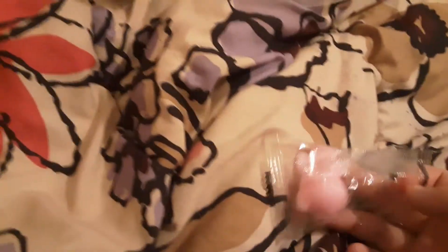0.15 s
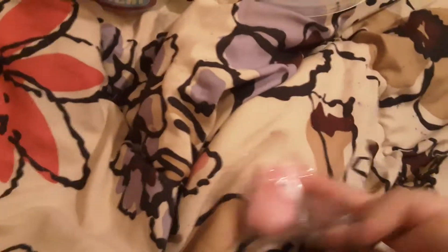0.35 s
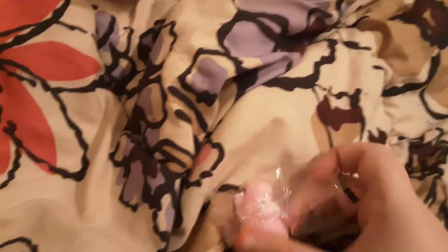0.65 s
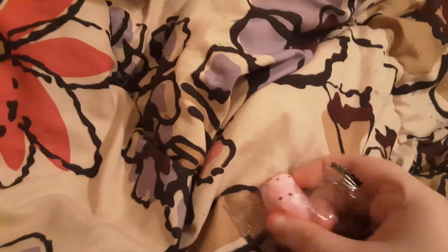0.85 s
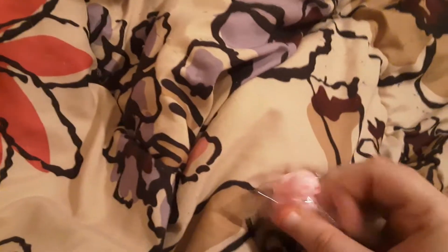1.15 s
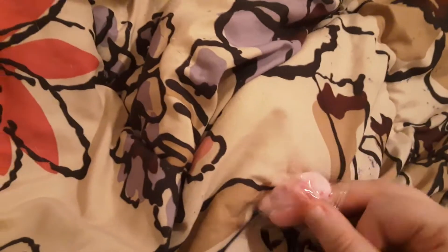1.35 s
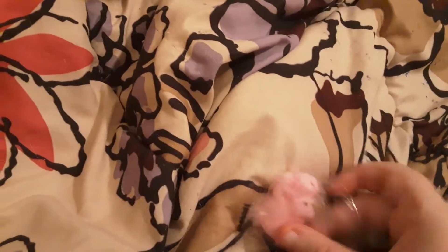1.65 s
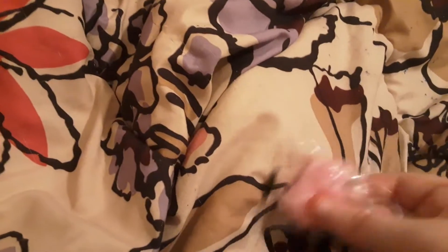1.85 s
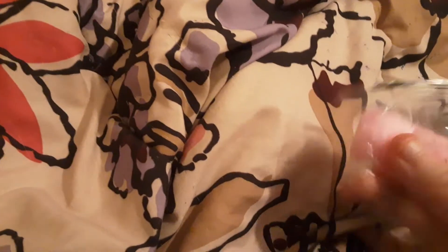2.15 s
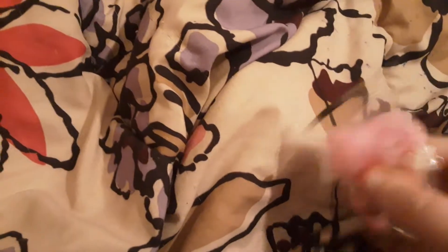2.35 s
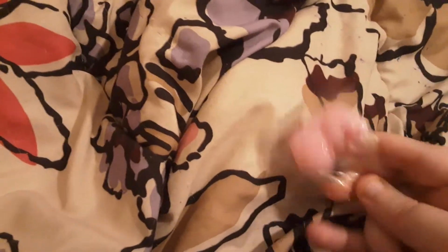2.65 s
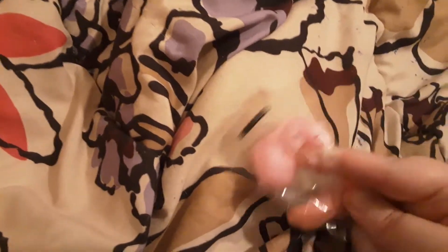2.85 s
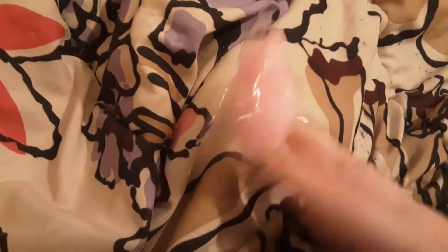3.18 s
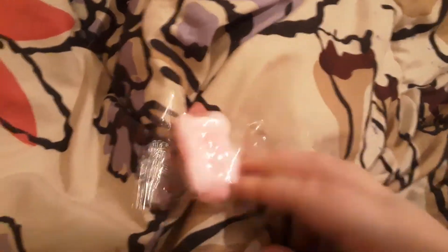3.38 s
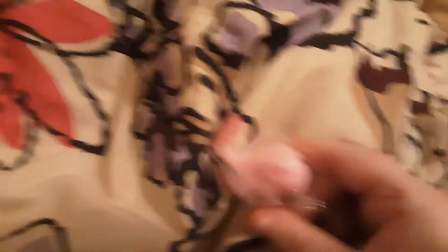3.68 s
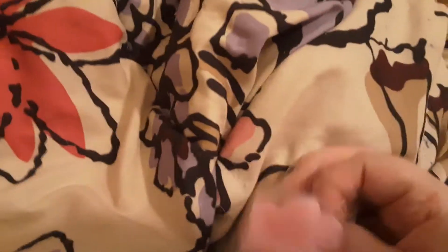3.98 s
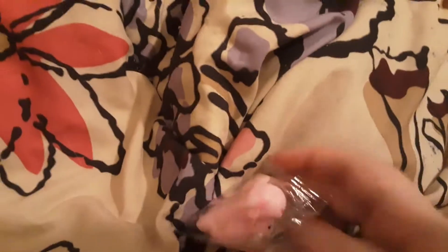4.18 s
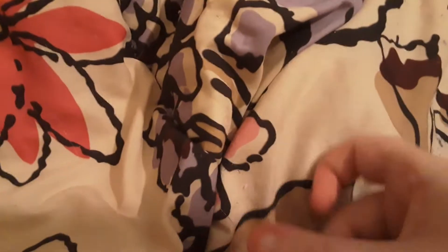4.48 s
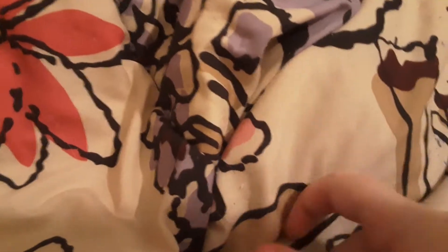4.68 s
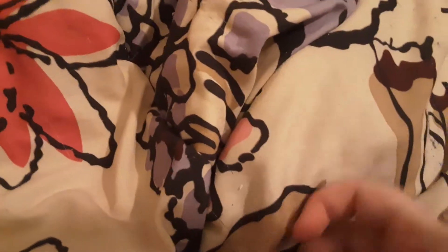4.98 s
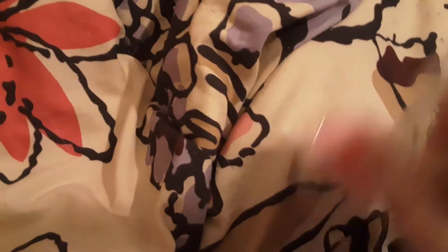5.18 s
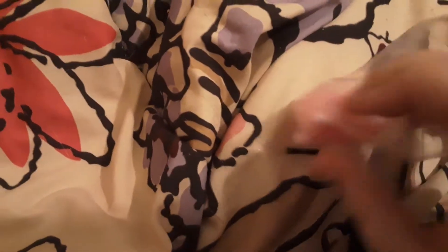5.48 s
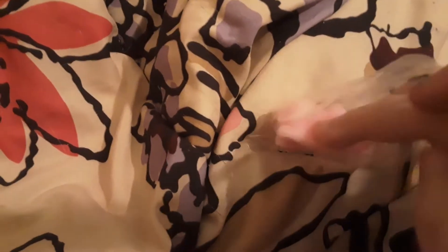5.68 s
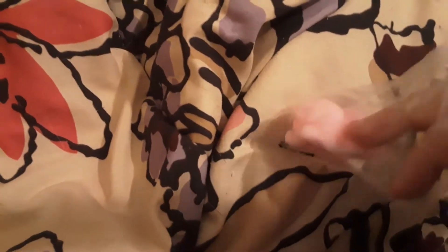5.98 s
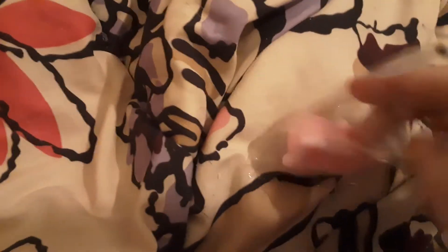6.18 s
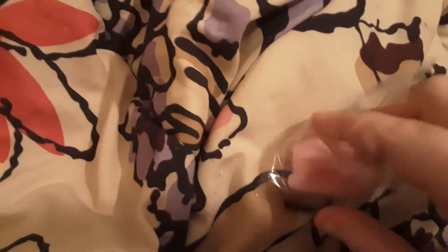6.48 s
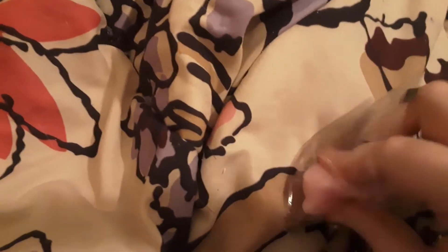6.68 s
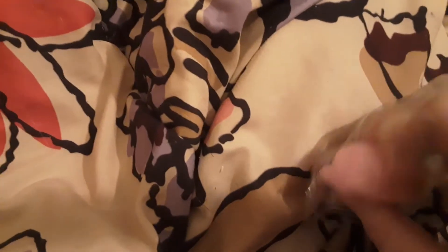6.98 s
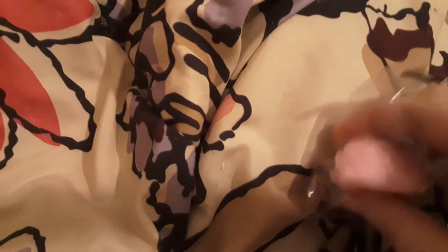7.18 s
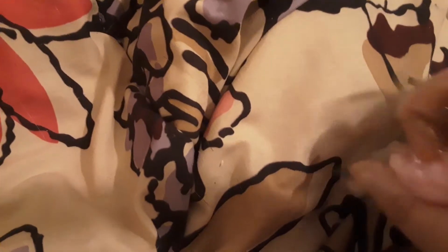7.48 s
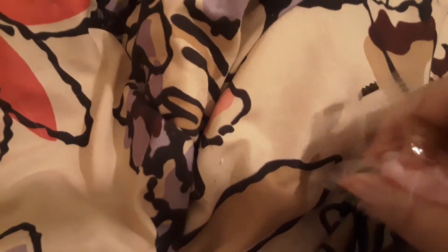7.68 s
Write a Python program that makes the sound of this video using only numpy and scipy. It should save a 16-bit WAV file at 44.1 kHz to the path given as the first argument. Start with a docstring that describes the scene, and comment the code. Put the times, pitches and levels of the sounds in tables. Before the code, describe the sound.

Continuous plastic crinkling, bright and brittle, comes in irregular crushes with brief gaps. Large folds snap singly, small ones fizz in clusters, and the stuffed packet gives soft, dull thuds. One standout click cuts through after the middle, followed by sparser crackle, a renewed dense flurry and a short ticking creak. Close miking, nearly dry small room, faint low beating motor hum underneath.

```python
"""From the first moment a hand kneads a thin, stiff plastic wrapper over a bed, close to a small microphone.
Its folds snap by buckling, large ones singly, small ones in swarms over a rustle of sliding film.
Knocks of a stuffed bag fall among them; the loudest snap comes past the middle, then the snaps thin out,
crowd together again and, near the end, a short stick-slip creak ticks. Throughout, the bed reflects once,
the walls reverberate faintly, and a distant motor beats in the quiet, resonant room."""
import sys
import numpy as np
from scipy import signal
from scipy.fft import rfft, irfft, next_fast_len
from scipy.io import wavfile
from scipy.ndimage import map_coordinates

SR = 44100
rng = np.random.default_rng(int(sys.argv[2]) if len(sys.argv) > 2 else 0)


def master(y):
    """Save y as 16-bit WAV."""
    cut = np.clip(np.atleast_2d(y).T, -1, 1)
    pcm = np.round(cut * 32767)  # scale
    wavfile.write(sys.argv[1], SR, pcm.astype(np.int16))


N = 345744


def amp(db):
    """Logarithmic level: decibels to amplitude gain."""
    return 10 ** (np.asarray(db) / 20)


def unit(x):
    """Normalisation to an rms of 1."""
    return x / np.sqrt(np.mean(x ** 2) + 1e-20)


def along(points, hz):
    """Linear interpolation of (frequency [Hz], value) points on a logarithmic frequency axis."""
    f, v = np.transpose(points)
    return np.interp(np.log(hz + 1), np.log(f + 1), v)


def wobble(rate):
    """Band-limited fluctuation: a smooth curve through random knots, rate of them a second."""
    knots = rng.standard_normal(int(N * rate / SR) + 4)
    return unit(map_coordinates(knots, [np.arange(N) * rate / SR]))


def filtered(x, response):
    """Linear filtering: the spectrum of x times a response of frequency."""
    m = next_fast_len(N + SR // 2)
    hz = np.fft.rfftfreq(m, 1 / SR)
    return irfft(rfft(x, m) * response(hz), m)[..., :N]


# The film as the microphone hears it, with the port resonance near 6 kHz:
# (frequency [Hz], relative spectral level [dB])
FILM_RESPONSE = [(180, -39.5), (300, -17), (427, -20), (685, -10), (1080, -17), (2340, -5.5), (3020, -15),
                 (4680, -6), (6330, 2.5), (8020, -5.5), (9020, -10), (13300, -8.5), (15500, -20),
                 (16800, -33)]
KNOCK_HZ, THUMP_HZ, FIZZ_HZ = 1350, 3050, 8700  # edges between knock, thump, crack and fizz


def film_parts(size=1024):
    """Minimum-phase response: four causal bands of the film, knock to fizz, each of mean power 1."""
    hz = np.fft.rfftfreq(size, 1 / SR)
    under = [1 / (1 + (hz / edge) ** 10) for edge in (KNOCK_HZ, THUMP_HZ, FIZZ_HZ)]
    shares = np.diff([0 * hz, *under, 1 + 0 * hz], axis=0)
    magnitude = amp(along(FILM_RESPONSE, hz)) * np.sqrt(np.abs(shares))
    # folding the cepstrum onto positive time makes each response causal
    cepstrum = irfft(np.log(magnitude + 1e-5), size)
    cepstrum[:, 1:size // 2] *= 2
    cepstrum[:, size // 2 + 1:] = 0
    parts = np.exp(rfft(cepstrum))
    return parts / np.sqrt(np.mean(np.abs(parts) ** 2, axis=1, keepdims=True))


def buckle(s, levels_db, rise_s, jolt_s, tail_s, tail_db, size=512):
    """Snap-through buckling: noisy force rises, jolts at time s and trembles, heard in four bands.

    Rise, jolt and tail are times per 60 dB; levels_db sets the energy of each band of each fold.
    """
    lead = size // 8  # samples kept for the rise
    t = (np.arange(size) - lead) / SR
    before = amp(60 * t / rise_s)
    after = amp(-60 * t / jolt_s) + amp(tail_db - 60 * t / tail_s)
    force = np.where(t < 0, before, after) * rng.standard_normal((len(s), size))

    # each fold frees a facet with its own damped pitch
    hz = np.fft.rfftfreq(2 * size, 1 / SR)
    facet_hz = 3200 * np.exp(rng.uniform(-1.46, 1.456, (len(s), 1)))
    damping_hz = .22 * facet_hz
    ring = 1 + 2.5j * hz * damping_hz / (facet_hz ** 2 - hz ** 2 + 1j * hz * damping_hz)

    spectrum = rfft(force, 2 * size) * ring * film_parts(2 * size)[:, None]
    sound = irfft(spectrum)[..., :size]
    sound *= amp(levels_db)[..., None] / np.linalg.norm(sound, axis=2, keepdims=True)
    at = (np.round(s * SR).astype(int)[:, None] + np.arange(size)).ravel()
    return np.array([np.bincount(at, part.ravel(), N + size)[lead:N + lead] for part in sound])


# Large folds snapping: (time [s], nominal crack level [dB],
# panel thump relative to crack [dB], edge fizz relative to crack [dB])
LARGE_SNAPS = [(0.0156, -17.0, -15, -15), (0.049, -16, -17, -8), (0.1185, -22, -28.5, -2),
               (0.1524, -20, -18, -16), (0.2, -17, -30, -10), (0.2125, -10, -16, -9),
               (0.2269, -14, -6, -12), (0.2664, -7.5, -21, -21), (0.2817, -17, -4, -10),
               (0.292, -14, -28, -16), (0.3018, -18, -10, -23), (0.3325, -19.5, -2, -9),
               (0.3471, -17, -24, -10), (0.4518, -13.5, -7.5, -4), (0.472, -11.5, -14, -1),
               (0.513, -8, -17, -17), (0.5747, -15, -26, -15), (0.611, -15.5, -22, -20),
               (0.6319, -18.0, -3.5, -12), (0.6536, -18, -12, -16), (0.6699, -15.5, -14, -12),
               (0.7045, -5.5, -16, -17), (0.7164, -15, -17, -22), (0.7529, -26, -20, -2),
               (0.7607, -15, -11, -19), (0.7664, -23, -15, -23), (0.7803, -18, -14, -9),
               (0.7984, -12, -12, -20), (0.8018, -14, -10, -11), (0.817, -3, -28, -4),
               (0.8307, -10.5, -19, -9), (0.837, -23, -23, -2), (0.8629, -20, -25, -1),
               (0.8672, -13, -23, -2), (0.881, -17, -13, -14), (0.8896, -13.5, -16, -11),
               (0.927, -16.5, -19, -16), (0.9324, -13, -24, -5), (0.9578, -27, 1.5, -18),
               (0.9664, -19, -24, -7), (0.9766, -9.5, -32, -16), (0.9804, -5.5, -36, -28),
               (0.987, -14.5, -16, -5), (1.0125, -9, -23, -5), (1.0259, -10.5, -18, -7),
               (1.0521, -19.5, -9, -15), (1.055, -12, -15, -1), (1.0643, -14, -18, -14),
               (1.073, -14, -26, -2), (1.0785, -7, -35, -19), (1.1422, -15.5, -24, -21),
               (1.1552, -14, -17, -2), (1.1692, -19, -12, -8), (1.1885, -9, -32, -13),
               (1.1955, -8.5, -32, -2), (1.2308, -12, -11, -6), (1.339, -9.5, -15, -19),
               (1.342, -12.5, -9, 1), (1.39, -11.0, -19, -18), (1.403, -16.0, -17, 0),
               (1.4977, -21, -15, -11), (1.5138, -18.5, -21, -17), (1.581, -18, -15, -12),
               (1.6152, -16, -17, 0), (1.6523, -16, -16, -17), (1.661, -13.0, -31, -13),
               (1.6947, -15, -20, -15), (1.7079, -20, -22, -12), (1.7193, -14.5, -8, -14),
               (1.8041, -26, -18, 2), (1.8132, -10, -20, -9), (1.847, -13, -18, -20),
               (1.9596, -19, -32, -10), (1.9846, -10.5, -18.5, -13), (2.0452, -16, -4, 5),
               (2.048, -9.5, -16, -15), (2.0543, -12, -9, -13), (2.078, -5.5, -16.5, -13),
               (2.1592, -17, -12, -7), (2.1643, -17.5, -4, -3), (2.2033, -16, -11, -10),
               (2.217, -19, -18, -15), (2.2263, -20, -21, -15), (2.2681, -17, -9, 0),
               (2.2924, -23.5, -16, -13), (2.3149, -22.5, -0.5, -17), (2.3632, -15, -8.5, -4),
               (2.3952, -9, -11, -2), (2.4014, -14.5, -6, 0), (2.406, -9.5, -21, -19),
               (2.4652, -13.5, -17, -15), (2.4839, -20, -33, -11), (2.5205, -16.5, -17, 3.5),
               (2.5511, -17.5, -13.5, -4), (2.6057, -16, -12, -15), (2.6202, -10, -23.5, -6),
               (2.6549, -21.0, -28, -9), (2.661, -16, -17, -10), (2.6979, -12, -21, -16),
               (2.7134, -19, -16, -17), (2.7785, -21.5, -29, -15), (2.851, -22, -26, -18),
               (2.9934, -14.5, -29, -23), (3.005, -11, -12.5, -12), (3.064, -8.5, -26, -5),
               (3.0788, -10.5, -9.5, -10), (3.0866, -10, -9, 1), (3.1025, -24.5, -11, 14),
               (3.1555, -9, -12.5, -3), (3.2143, -9, -37, -4), (3.2208, -18, -17, -12),
               (3.2543, -14.0, -19, 1), (3.268, -14.5, -32, -2), (3.2818, -10, -15, -9),
               (3.2882, -12, -31, 3), (3.3751, -20.5, -11, -23), (3.3847, -10.5, -20, -16),
               (3.389, -17, -18, -13), (3.407, -14, -19, -9), (3.434, -12.5, -15, -11),
               (3.4665, -18, -9, -3), (3.507, -19.5, -21, -8), (3.5336, -21, -20, -6), (3.56, -11, -12, -6),
               (3.5658, -11.5, -14, -4), (3.5707, -13.5, -10.5, -4), (3.602, -18, -17, -4),
               (3.614, -25, -11, -12), (3.639, -8, -18, -2), (3.711, -15, -25, -6), (3.722, -10, -31, -8),
               (3.734, -13, -12, -13), (3.7466, -11, -5, -1), (3.7634, -9.0, -26, -18),
               (3.7748, -3.5, -30, -15), (3.8044, -23, -9, -11), (3.8199, -13, -26, -8),
               (3.8239, -20, -25, -16), (3.8437, -19, -25, -17), (3.8469, -11.5, -11.5, -5),
               (3.8726, -23, -9, -7), (3.9193, -20.5, -20, -7), (3.9656, -22, -29, 7),
               (3.9764, -9, -22, -3), (4.0086, -9, -24, -13), (4.0335, -15, -23, -8),
               (4.0548, -9.5, -18, -11), (4.0653, -23, -2, 8), (4.0934, -20, -10, -18),
               (4.1058, -18, -3.5, -1), (4.1097, -13.5, -12, -6), (4.163, -16, -14, -18),
               (4.1708, -16.5, -11.5, -11), (4.2402, -20.5, -17, -13), (4.297, -15.0, -16, -11),
               (4.309, -6, -23, -14), (4.3308, -16, -26, -13), (4.3383, -11, -29, -23),
               (4.3435, -4, -16, -14), (4.3559, -6.5, -25, -14), (4.3662, -8.5, -15.5, -6),
               (4.3715, -17, -26, -10), (4.503, -17, -15.5, -13), (4.5711, 0.5, -23, -19),
               (4.5924, -7, -18, -9), (4.5956, -7, -10.5, -8), (4.6661, -16, -11, -7),
               (4.692, -17.5, -7.5, -17), (4.8284, -20, -22, -16), (4.8418, -11, -15, -17),
               (4.846, -17, -19, -17), (4.8704, -16, -19, -14), (4.8776, -19, -6, -11),
               (4.9022, -14, -12, -3), (4.913, -22.5, -9, -7), (4.9686, -12, -11, -14),
               (4.987, -12, -11, -16), (5.012, -19.5, 0, -19), (5.028, -12, -14, -12),
               (5.0581, -10, -8.5, -19), (5.1531, -16.5, -8, 1), (5.255, -16.5, -17, -15),
               (5.2749, -13.5, -18, -21), (5.376, -21, -13, -4), (5.3927, -12, -13.5, -5),
               (5.4036, -6.5, -18, -3), (5.4306, -16.5, -16, -7), (5.4688, -16, -11, -15),
               (5.5648, -16.5, -9, -3), (5.5718, -10, -13, -4), (5.5858, -17.0, -18, 1),
               (5.6173, -15, -10, -16), (5.648, -15, -17, -13), (5.6523, -20, -14, 0),
               (5.7129, -17.5, -13, -9), (5.7876, -17.5, -14, -7), (5.9454, -23.5, -15, -9),
               (5.9683, -14, -15.5, -14), (6.132, -11, -9, -12), (6.19, -17.5, -10, -9),
               (6.259, -17.5, -17, 1.5), (6.2816, -20.5, -4.5, -4), (6.4894, -19.5, -2, -12),
               (6.5092, -24, -6, -1), (6.5212, -16, -9, -8), (6.5406, -22.5, -6, -11),
               (6.548, -18.5, -21, 2.5), (6.562, -18, -8, -4), (6.5935, -21, -10, -9),
               (6.6089, -14, -13, -10), (6.677, -20, -22, -4), (6.7468, -14.5, -15, -6),
               (6.7552, -10, -16, -10), (6.8027, -18, -18, 1), (6.813, -9, -13, -3), (6.824, -8.5, -22, 2),
               (6.8344, -16.5, -1.5, -12), (6.8471, -10, -7, -7), (6.8668, -14.0, -18, -6),
               (6.8723, -16, -13, -9), (6.89, -12, -17, -11), (6.8927, -19, -20, -7),
               (6.943, -14.5, -23, 0), (6.947, -13, -24, -10), (6.9604, -11, -9, -1),
               (6.9639, -12, -17, -5), (6.9717, -22, -18, -2), (7.0252, -8.5, -17, -7),
               (7.031, -17, -12, -5), (7.0478, -13, -16, -7), (7.0523, -16, -16, -9),
               (7.069, -17.5, -13, -12), (7.0876, -7, -13, -2), (7.0913, -12, -13, -9),
               (7.1004, -6.5, -24, -12), (7.1105, -9, -18, -3), (7.1144, -9.5, -14, -8),
               (7.1424, -23.0, -25, 8), (7.1543, -9.5, -17, -7), (7.164, -10.5, -11, -1),
               (7.185, -9.5, -12, -5), (7.2577, -24, -6, -6), (7.2732, -18, -20, 0),
               (7.2847, -16.5, -25, -12), (7.3335, -19, -27, 3), (7.3414, -13, -24, -12),
               (7.365, -12, -12, -23), (7.3696, -16.0, -11, -9), (7.379, -13.5, -6.5, -9),
               (7.387, -14, -23, -6), (7.4093, -16.5, -5, -3), (7.4204, -12.5, -21, -3),
               (7.4897, -27, 2, -3), (7.5898, -14, -7, -7), (7.6294, -17, -22, -9), (7.6517, -15, -31, -13),
               (7.688, -21.0, -8, -16), (7.7113, -21, -22, -15), (7.8304, -18, -4.5, -7),
               (7.8376, -10, -1.5, -13)]
# a snap's knock under its crack [dB]; its share of the thump's swing; its random spread [dB]
KNOCK_DB, KNOCK_FOLLOWS, KNOCK_SCATTER_DB = -20, 0.49, 4


def large_folds():
    """Snap-through of single large folds; a deeper thump brings on average a stronger knock of the bag."""
    s, crack_db, thump_db, fizz_db = np.transpose(LARGE_SNAPS)
    knock_db = KNOCK_DB + KNOCK_FOLLOWS * thump_db + KNOCK_SCATTER_DB * rng.standard_normal(len(s))
    # deeper parts ring longer, so hold more energy for their peak
    spread_db = [[15.5], [13.5], [10.5], [8.5]]
    levels_db = crack_db + np.array([knock_db, thump_db, 0 * s, fizz_db]) + spread_db
    return buckle(s - .0002, levels_db, rise_s=.0017, jolt_s=.0011, tail_s=.007, tail_db=-19).sum(0)


def small_folds():
    """Superposed random impulses: swarms of small snaps over the friction noise of film sliding on film."""
    t = np.arange(N) / SR
    swarm_db = 2.9 * np.tanh(1.0 * wobble(70))  # neighbouring folds swell together
    draw = rng.random((2800, 6))  # one row a fold: time, size and the colour of four bands
    when = draw[:, 0] * (N - 1) / SR
    scatter_db = 2.94 * np.minimum(-np.log(draw[:, 1] + 1e-9), 3.5)
    size_db = np.interp(when, t, swarm_db) + scatter_db
    colour_db = 17.3 * (draw[:, 2:].T - .5)
    folds = buckle(when, size_db + colour_db, rise_s=0.0016, jolt_s=0.0014, tail_s=0.0039, tail_db=-19)
    folds /= np.sqrt(np.mean(folds ** 2, axis=1, keepdims=True))

    noise = rng.standard_normal((4, N))
    sliding = signal.fftconvolve(noise, irfft(film_parts()), axes=1)[:, :N]

    coarse_t = t[::64]
    hand_db, dull_db = (np.interp(t, coarse_t, curve) for curve in hand(coarse_t))
    # about .6 at rest, where small snaps weaken a little beside the sliding film; near 1 in a crush
    busy = 1 / (1 + np.exp(-(hand_db + 62.5) / 3))
    sliding_db = -2.5 - 7.3 * busy + busy * (0.75 * swarm_db + 4.1 * wobble(160))
    bands = amp(-1.5) * busy * folds + amp(sliding_db) * sliding
    knock, thump, crack, fizz = bands * amp(hand_db)
    dull = amp(-4.0) * knock + amp(1.8) * thump
    return amp(dull_db) * dull + amp(4.04) * crack + amp(-5.5) * fizz


# The hand closing on the film: (start [s], hold [s], drive of the small folds [dB],
# their low parts relative to that drive [dB])
HAND_CRUSHES = [(0.003, 0.028, -59, -1), (0.052, 0.099, -52, 2), (0.151, 0.016, -42.5, 2),
                (0.218, 0.11, -37.5, -5.5), (0.382, 0.047, -47, -1.5), (0.446, 0.13, -48, -3),
                (0.496, 0.008, -36, -8), (0.558, 0.11, -41, -3), (0.715, 0.025, -37.5, -1.5),
                (0.785, 0.016, -27, -7.5), (0.897, 0.25, -42, -7), (1.03, 0.009, -37, -17),
                (1.161, 0.081, -38.5, -7.5), (1.337, 0.032, -42.5, -4.5), (1.535, 0.11, -35, -6.5),
                (1.696, 0.043, -35, -3.5), (1.778, 0.02, -41, -3), (1.864, 0.034, -37.5, -7.5),
                (1.963, 0.13, -39, -9), (1.976, 0.011, -29.5, -6.5), (2.081, 0.028, -39.5, -17),
                (2.162, 0.032, -41.5, -8), (2.247, 0.036, -43.5, -5), (2.36, 0.14, -44, -6),
                (2.401, 0.007, -34.5, -7), (2.55, 0.078, -45.5, -8.5), (2.674, 0.017, -35.5, -6),
                (2.76, 0.16, -53.5, -2), (3.016, 0.13, -40.5, -3), (3.077, 0.0079, -30, -8),
                (3.185, 0.082, -39, -8.5), (3.31, 0.028, -48, -6), (3.388, 0.118, -42, -3.5),
                (3.519, 0.085, -38.5, -5), (3.715, 0.026, -41, -3.5), (3.795, 0.043, -32.5, -8.5),
                (3.92, 0.2, -39, -6.5), (4.219, 0.065, -51, 0), (4.298, 0.051, -39.5, -4),
                (4.331, 0.016, -31.5, -5), (4.47, 0.03, -50.5, -1), (4.588, 0.057, -37.5, -3),
                (4.823, 0.01, -32, -2.5), (4.915, 0.075, -42.5, -1.5), (5.037, 0.084, -33, -3.5),
                (5.2, 0.043, -48, 1), (5.267, 0.021, -37, -7), (5.398, 0.077, -42, -3.5),
                (5.544, 0.029, -40.5, -4), (5.639, 0.035, -44, -5.5), (5.755, 0.05, -48.5, -3),
                (5.849, 0.036, -44.5, -8.5), (5.98, 0.022, -49, -3), (6.065, 0.073, -46, -1.5),
                (6.18, 0.037, -45, -4), (6.255, 0.036, -48, -4), (6.324, 0.035, -72, -2),
                (6.463, 0.21, -48.5, -1.5), (6.675, 0.027, -42, -7.5), (6.758, 0.039, -46.5, 1),
                (6.821, 0.047, -36.5, -5.5), (6.906, 0.034, -36.5, -7), (7.018, 0.1, -41, -6),
                (7.164, 0.03, -37, -3), (7.276, 0.048, -40, -6), (7.37, 0.011, -36, -8.5),
                (7.465, 0.03, -53.5, -3), (7.541, 0.0035, -35.5, -4), (7.64, 0.045, -45, -10.5),
                (7.746, 0.071, -45.5, -3)]
ATTACK_DB_PER_S, RELEASE_DB_PER_S = 595, 280
REST_DB, REST_DULL_DB = -61, -7  # drive and relative low parts between crushes


def hand(t):
    """Power summation of crushes that rise fast, hold and release slowly; gives drive and dullness in dB."""
    start, hold, db, dull_db = np.transpose(HAND_CRUSHES)[..., None]
    attack_db = ATTACK_DB_PER_S * np.maximum(start - t, 0)
    release_db = RELEASE_DB_PER_S * np.maximum(t - start - hold, 0)
    power = amp(db - attack_db - release_db) ** 2
    rest = amp(REST_DB) ** 2
    total = power.sum(0) + rest
    dullness_db = ((power * dull_db).sum(0) + rest * REST_DULL_DB) / total
    return 10 * np.log10(total), dullness_db


# The stuffed bag knocking as it gives way: (time [s], nominal level [dB])
BAG_KNOCKS = [(0.047, -37), (0.067, -24.5), (0.231, -25.5), (0.78, -28), (1.024, -27), (1.09, -27.5),
              (1.338, -35), (1.565, -24), (1.676, -30), (1.775, -26.5), (2.398, -20.5), (3.004, -29),
              (3.154, -26), (3.213, -23.5), (3.279, -33), (3.382, -42), (3.733, -27), (3.894, -27.5),
              (4.088, -27), (4.169, -25), (4.555, -29), (4.967, -22.5), (5.026, -27), (5.374, -30),
              (5.458, -29.5), (5.571, -23), (5.966, -26), (6.13, -39), (6.279, -23), (6.521, -25),
              (6.663, -34), (6.745, -25), (7.022, -26), (7.05, -21), (7.087, -37), (7.183, -22.5),
              (7.275, -28), (7.361, -37), (7.488, -20.5), (7.588, -41)]


def knocks():
    """Impulsive excitation of the whole bag: dull blows, nearly all low part."""
    s, db = np.transpose(BAG_KNOCKS)
    levels_db = db + np.array([[13], [4], [-3], [-12]])
    return buckle(s + 0.001994, levels_db, rise_s=0.0031, jolt_s=0.006, tail_s=0.0075, tail_db=-12).sum(0)


# Film creaking as it is drawn tight: (start [s], end [s], slip rate [1/s], nominal level [dB])
FILM_CREAKS = [(7.732, 7.812, 280, -23.5)]


def creaks():
    """Stick-slip friction: dull ticks at a nearly even rate, swelling and fading."""
    out = np.zeros(N)
    for start, end, rate, db in FILM_CREAKS:
        s = np.arange(start, end, 1 / rate)
        place = (2 * s - start - end) / (end - start)  # -1 at the start, 1 at the end
        swell_db = -9 * place ** 2 + rng.normal(0, 1.5, len(s))
        levels_db = db + swell_db + np.array([[-1.2], [0], [-5.5], [-15]])
        s = s + rng.normal(0, 0.077, len(s)) / rate
        out += buckle(s, levels_db, rise_s=0.0013, jolt_s=0.00079, tail_s=0.0033, tail_db=-27).sum(0)
    return out


# Decay of the reverberation between the walls: (frequency [Hz], time to fall 60 dB [s])
WALL_DECAY = [(300, 0.64), (2000, 0.43), (6000, 0.028), (14000, 0.058)]


def room(x):
    """Reflection and reverberation: one bounce off the bed, then a tail decaying by frequency."""
    hz, t, z = signal.stft(rng.standard_normal(SR // 4), SR, nperseg=256)
    decay = amp(-60 * t / along(WALL_DECAY, hz)[:, None])
    tail = signal.istft(z * decay, SR, nperseg=256)[1]
    tail /= np.linalg.norm(tail)
    bed = amp(-22.5) * np.pad(x, (round(0.0031 * SR), 0))[:N]
    walls = amp(-25.0) * signal.fftconvolve(np.pad(x, (200, 0)), tail)[:N]
    return bed + walls


# Spectrum of the room air: (frequency [Hz], relative spectral level [dB])
AIR_SPECTRUM = [(20, -45), (39, -23), (50, -3), (100, -9.5), (180, -10), (230, -10), (300, -16),
                (450, -17.5), (700, -18.5), (1100, -23), (2400, -44), (2950, -66), (6600, -56),
                (12000, -65), (16000, -56)]
# Room resonances, each a narrow band of noise:
# (centre [Hz], half-width where amplitude falls to 1/e [Hz], rms level [dB])
ROOM_RESONANCES = [(57.6, 6.2, -61.5), (83.6, 10, -55.5), (126.4, 7.3, -56.5), (151, 6.2, -69),
                   (219, 12.3, -63)]
# A motor's mains tone and the side tones of its slip, which make it throb:
# (frequency [Hz], rms level [dB])
MOTOR_TONES = [(118.22, -64), (119.98, -56), (121.74, -59.5)]
CREST_S = .1  # a moment at which the throb is strongest


def hum():
    """Beating of close motor tones, with narrow-band room resonances on steady air noise."""
    air = unit(filtered(rng.standard_normal(N), lambda hz: amp(along(AIR_SPECTRUM, hz))))
    out = amp(-52.0) * air
    t = np.arange(N) / SR - CREST_S
    for tone_hz, db in MOTOR_TONES:
        out += amp(db) * unit(np.sin(2 * np.pi * tone_hz * t))
    for centre, width, db in ROOM_RESONANCES:
        band = filtered(rng.standard_normal(N), lambda hz: np.exp(-((hz - centre) / width) ** 2))
        out += amp(db) * unit(band)
    return out


def scene():
    """Superposition of the wrapper, its echoes and the room."""
    film = large_folds() + knocks() + creaks() + small_folds()
    return (film + room(film) + hum())[None]


CEILING, KNEE = .9, 5  # limit of the input stage [full scale]; sharpness of its bend
TOP_HZ = 16600  # band limit


def record(dry):
    """Soft saturation rounds off the very loudest snaps; band-limiting removes all above TOP_HZ."""
    rounded = dry / (1 + np.abs(dry / CEILING) ** KNEE) ** (1 / KNEE)
    return filtered(rounded, lambda hz: hz < TOP_HZ)


dry = scene()
out = record(dry)
master(out)
```